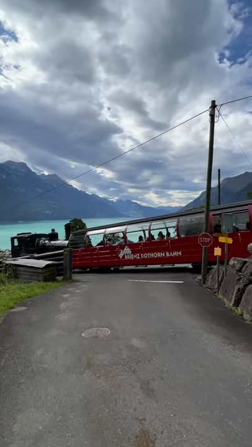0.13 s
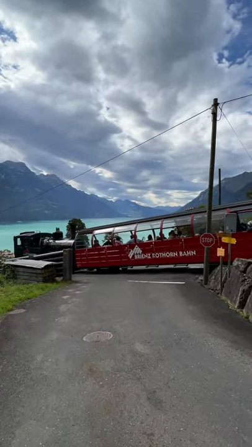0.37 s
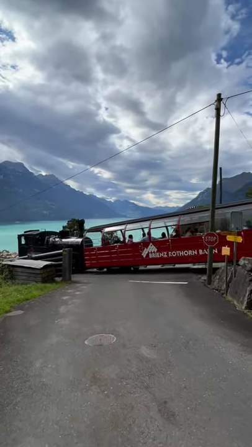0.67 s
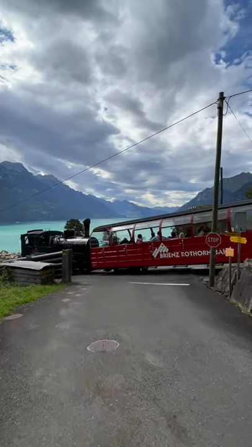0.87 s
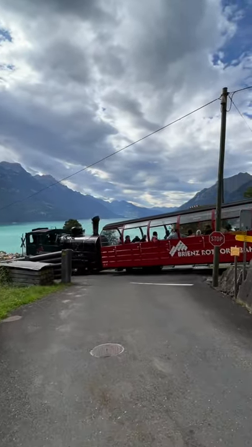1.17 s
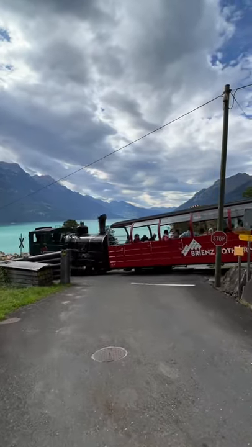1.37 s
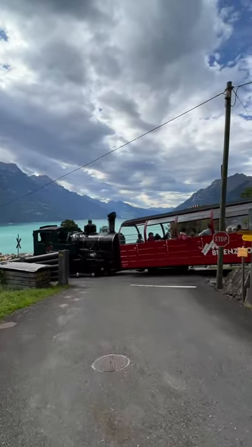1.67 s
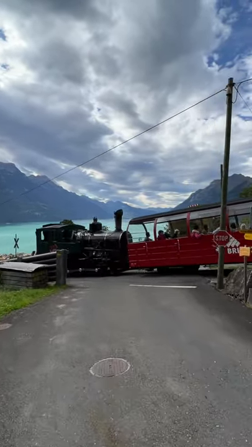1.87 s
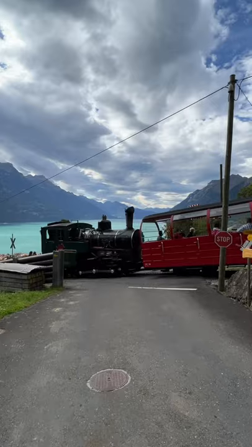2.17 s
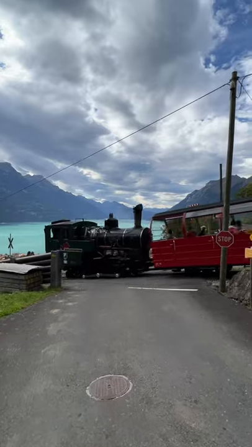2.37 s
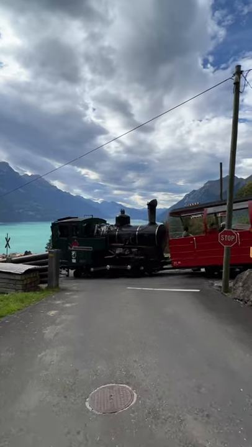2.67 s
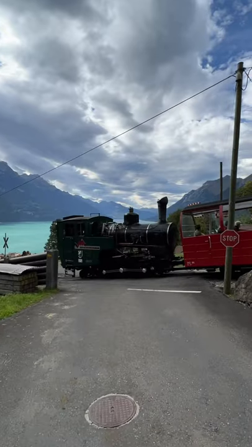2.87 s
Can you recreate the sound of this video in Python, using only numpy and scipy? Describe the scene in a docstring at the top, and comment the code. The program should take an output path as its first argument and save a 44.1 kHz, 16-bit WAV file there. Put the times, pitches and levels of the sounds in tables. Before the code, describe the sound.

Fast, regular steam train chuffing passes outdoors, with rumbling wheels and leaking steam.

```python
"""Small steam locomotive at a road crossing.

It pushes a coach across, some way ahead and left of a stereo microphone, over rumbling running gear.
The exhaust beats four times to each turn of the drive, unevenly: strong, weak, weak, fairly strong.
Each beat is a pop, a bark, a hiss, a thump and a short boom of the chimney.
The echo off the road lags more as the distance shrinks, so the bark sinks in colour."""
import sys
import numpy as np
from scipy import signal
from scipy.fft import rfft, irfft
from scipy.io import wavfile
from scipy.ndimage import uniform_filter1d, minimum_filter1d

SR = 44100
rng = np.random.default_rng(int(sys.argv[2]) if len(sys.argv) > 2 else 0)


def master(y):
    """Save y as 16-bit WAV."""
    cut = np.clip(np.atleast_2d(y).T, -1, 1)
    pcm = np.round(cut * 32767)  # scale
    wavfile.write(sys.argv[1], SR, pcm.astype(np.int16))


N = 132741
TIME = np.arange(N) / SR
HZ = np.fft.rfftfreq(N, 1 / SR)

# Exhaust beats. Each row: start in seconds, then relative bark, hiss, boom and thump levels in dB.
CHUFFS = [(0.019, -14, -19, -16, -9), (0.095, -22.5, -25, -23.4, -21), (0.168, -23, -27, -22, -18),
          (0.248, -18, -24, -16.5, -22), (0.325, -15.5, -20.5, -16.5, -17), (0.4, -19.5, -24, -23, -18),
          (0.47, -19.5, -26.5, -21, -20), (0.549, -16.5, -22, -18, -16), (0.627, -13.5, -19, -18.0, -17),
          (0.699, -21, -26, -44, -20), (0.771, -18.5, -27.5, -27, -17.5), (0.852, -15, -22, -18.5, -15),
          (0.928, -14.5, -19.5, -26.5, -27), (0.997, -23.5, -25, -27, -14.5),
          (1.071, -22.5, -25.5, -21.5, -25), (1.149, -13.5, -21.5, -16, -19.5),
          (1.225, -13.1, -19, -20, -16), (1.295, -20, -24.5, -29, -17.5), (1.367, -17, -25.5, -38, -27),
          (1.445, -13.5, -21, -28, -16.5), (1.521, -14.5, -18.5, -17, -15), (1.592, -18.5, -26, -32, -13.5),
          (1.663, -20.5, -27.5, -22, -19), (1.743, -13.5, -24.5, -20.5, -15.5),
          (1.815, -15.5, -19.5, -19, -17.5), (1.888, -19.5, -27, -30, -35), (1.959, -21.5, -27, -38, -17),
          (2.037, -15.5, -25.5, -27.5, -20.5), (2.112, -16, -22.5, -25, -17.5), (2.183, -21, -27, -23, -18),
          (2.256, -19, -28, -43, -15.5), (2.336, -16.5, -23, -26, -27), (2.412, -17.5, -19, -18.5, -15),
          (2.485, -19.5, -27, -38, -22), (2.556, -18.5, -27.5, -26, -24), (2.64, -15.5, -23, -26, -25),
          (2.719, -15.5, -18, -28.5, -13), (2.791, -18, -27.5, -33, -12.5), (2.866, -17.5, -27, -68, -25),
          (2.95, -14, -23, -59, -26)]
# The four beats of a turn. Each row: the bark's lead, rise and hold in seconds, its fade in dB per
# second, then boom, thump and pop accents in dB.
BEATS = [(.001, 0.0045, 0.014, 398, 6.5, 2.5, -4), (.001, 0.0088, 0.018, 362, 5.5, 4, -15),
         (.002, 0.0072, .016, 392, 3.5, 2, -17), (.002, .007, .014, 409, 5, 5.5, -10)]


def amp(db):
    """Decibels to gain."""
    return 10 ** (np.asarray(db) / 20)


def unit(x):
    """Scales to rms 1."""
    return x / np.sqrt(np.mean(x ** 2) + 1e-20)


def curve(points):
    """A table over frequency, joined on a log axis."""
    hz, value = np.transpose(points)
    return np.interp(np.log(HZ + 1), np.log(hz + 1), value)


def noise(spectrum):
    """Two unrelated noises of one colour. Each spectrum row: frequency in Hz, relative level in dB."""
    return unit(irfft(rfft(rng.standard_normal((2, N))) * amp(curve(spectrum)), N))


def flutter(rate_hz):
    """A smooth random wobble up to about this rate, rms 1."""
    return unit(irfft(rfft(rng.standard_normal(N)) / (1 + (HZ / rate_hz) ** 2), N))


def rumble():
    """The weight of the train on the track, and the low grinding of its wheels."""
    # Colours of track and wheels. Each row: frequency in Hz, relative level in dB.
    track_colour = [(8, -60), (20, -44), (29, -28), (40, -0.5), (60, 0.5), (80, -8), (105, -10),
                    (150, -7.5), (200, -11.5), (260, -15.5), (500, -56), (1500, -100)]
    grind_colour = [(100, -53), (165, -24), (200, 9), (245, -12.5), (305, 3.5), (370, -12), (600, -29),
                    (2000, -86)]
    # Swell of the grinding. Each row: time in seconds, level in dB.
    grind_level = [(0, -35), (.8, -39), (1.3, -28.5), (1.9, -31.5), (2.3, -33), (3, -34.5)]
    grind = amp(np.interp(TIME, *np.transpose(grind_level))) * noise(grind_colour)[0]
    return amp(-25.5) * noise(track_colour)[0] + grind


def running_gear():
    """An uneven wash of wheels, rods and leaking steam that draws nearer."""
    # Colour of the wash. Each row: frequency in Hz, relative level in dB.
    colour = [(100, -59), (200, -11), (300, 5), (400, 0), (700, 1), (1000, -8), (2500, -14.5), (4400, -20),
              (6000, -22.5), (10000, -26), (12200, -26), (15500, -31)]
    rise_db_per_s = 1.5
    return amp(-31) * unit(noise(colour) * amp(rise_db_per_s * TIME + 0.5 * flutter(rate_hz=4.2)))


def road_echo(x):
    """Adds the bounce off the road, duller and ever later as the train nears the microphone."""
    # Delay of the bounce. Each row: time in seconds, lag in milliseconds.
    lags = [(0, 1.49), (.9, 1.9), (1.8, 2.19), (2.4, 2.505), (3, 2.68)]
    cutoff_hz = 2450
    lag_s = np.interp(TIME, *np.transpose(lags)) / 1000
    dull = irfft(rfft(x) / (1 + (HZ / cutoff_hz) ** 2), N)
    return x + amp(-7.5) * np.array([np.interp(TIME - lag_s, TIME, channel) for channel in dull])


def microphone(x):
    """Places the train to the left: one signal reaches both ports, the other is scattered to the right."""
    # Likeness of the two ports. Each row: frequency in Hz, coherence from 0 to 1.
    likeness = [(150, 0.94), (260, 0.99), (350, 0.73), (600, 1), (800, 1), (1250, 0.18), (1750, 0.86),
                (2400, 0.34), (3500, 0.75), (6700, 1), (10000, 0.51), (12600, 1)]
    # Their balance. Each row: frequency in Hz, left minus right in dB.
    balance = [(170, -3), (290, -4), (380, -2), (540, 10), (680, 7.5), (830, 0.5), (1200, 14.5), (1750, 3),
               (2600, 2), (3500, 0), (4500, 3.5), (5500, 0)]
    # Their phase. Each row: frequency in Hz, lead of the left in radians.
    lead = [(170, 0.15), (260, 0.58), (430, 1.48), (750, 1.82), (950, 3.15), (1150, 5), (1750, 7.26),
            (2300, 7.7), (2900, 10.36), (4000, 11.26), (4600, 10.9), (4900, 8.9), (5200, 5.1), (5800, 5.1),
            (6700, 5.2), (8500, 5.7), (10000, 4.07), (11500, 4.43), (12600, 3.15)]
    shared, scattered = rfft(x)
    like, tilt = np.clip(curve(likeness), 0, 1), amp(curve(balance))
    right = (like * shared + np.sqrt(1 - like ** 2) * scattered) * np.exp(-1j * curve(lead))
    return irfft(np.array([tilt * shared, right]) * np.sqrt(2 / (1 + tilt ** 2)), N)


def chimney_boom():
    """Each beat shoves the air with a thump and rings the chimney's lowest resonance."""
    boom_hz, boom_rise_s, boom_t60_s = 144.4, 0.0021, 0.2
    thump_hz, thump_rise_s, thump_lead_s = 52, 0.012, 0.0033
    out = np.zeros(N)
    for k, (start, _, _, boom_db, thump_db) in enumerate(CHUFFS):
        boom_accent, thump_accent = BEATS[k % len(BEATS)][4:6]
        part = out[round((start - thump_lead_s) * SR):][:SR // 3]
        age = TIME[:len(part)]
        t = np.maximum(age - thump_lead_s, 0)
        boom = np.minimum(t / boom_rise_s, 1) * amp(boom_db + boom_accent - 60 * t / boom_t60_s)
        swell = age / thump_rise_s
        thump = amp(thump_db + thump_accent) * (swell * np.exp(1 - swell)) ** 3
        part += thump * np.sin(2 * np.pi * thump_hz * age) - boom * np.sin(2 * np.pi * boom_hz * t)
    return signal.sosfilt(signal.butter(2, 30, "high", fs=SR, output="sos"), out)


def pop_at(seconds):
    """Pitch and level of the pop at a moment."""
    # The pop as the valve opens. Each row: time in seconds, pitch in Hz, relative level in dB.
    course = [(0, 635, -0.5), (.33, 628, 4), (.63, 636, 1.5), (0.931, 569, 1), (1.52, 579, -2.5),
              (1.82, 547, -9.5), (2.11, 510, -1.5), (2.42, 403, -4), (2.72, 333, -5.5), (3, 280, -15)]
    times, hz, db = np.transpose(course)
    return np.interp(seconds, times, hz), np.interp(seconds, times, db)


def pops():
    """The first slug of steam in each beat gives a short pitched pop of a few cycles."""
    # The pop's partials. Each row: multiple of its pitch, relative level in dB.
    modes = [(.8, -21), (0.999, -4), (1.24, -7.5)]
    lead_s, rise_s, pitch_drift = 0.0011, 0.0029, 0.062
    out = np.zeros(N)
    for k, (start, *_) in enumerate(CHUFFS):
        detune, glide = rng.standard_normal(2)
        part = out[round((start - lead_s) * SR):][:SR // 20]
        swell = TIME[:len(part)] / rise_s
        pitch_hz, pop_db = pop_at(start)
        hz = pitch_hz * (1 + pitch_drift * (.5 * detune + glide * np.tanh(swell - 1)))
        cycles = np.cumsum(hz) / SR
        ring = sum(amp(db) * np.sin(2 * np.pi * ratio * cycles) for ratio, db in modes)
        part += amp(BEATS[k % len(BEATS)][6] + pop_db) * swell * np.exp(1 - swell) * ring
    return out


def puffs(level_column, shapes):
    """Steam flow: the valve eases open, holds, the cylinder empties; the surroundings add a faint tail."""
    tail_db, tail_db_per_s = -25, 70
    power = np.zeros(N)
    for k, chuff in enumerate(CHUFFS):
        lead, rise, hold, fade_db_per_s = shapes[k % len(shapes)][:4]
        first = max(round(chuff[0] * SR) - SR // 40, 0)
        t = TIME[first:first + SR // 2] - chuff[0] + lead
        opening = .5 + .5 * np.tanh(2 * (t / rise - .5))
        late = np.maximum(t - hold, 0)
        decay = amp(-fade_db_per_s * late) ** 2 + amp(tail_db - tail_db_per_s * late) ** 2
        power[first:first + len(t)] += (amp(chuff[level_column]) * opening) ** 2 * decay
    return np.sqrt(power)


def hoot(x, pitch_ratio=1.034, width_hz=100):
    """A resonance just above the pop's pitch sinks with it and makes the bark hollow."""
    carrier = np.exp(2j * np.pi * np.cumsum(pitch_ratio * pop_at(TIME)[0]) / SR)
    pole = np.exp(-np.pi * width_hz / SR)
    ring = 2 * (carrier * signal.lfilter([1 - pole], [1, -pole], x / carrier)).real
    return x + amp(-7.5) * ring


def swirl(x, depth_db=2.5, patch_hz=240, patch_s=.035):
    """Turbulence gives each puff its own patches of colour."""
    hz, t, spectra = signal.stft(x, SR, nperseg=512, noverlap=384)
    patches = rng.standard_normal(spectra.shape[1:])
    for axis, steps in enumerate((patch_hz / hz[1], patch_s / t[1])):
        patches = uniform_filter1d(patches, max(round(steps), 1), axis)
    gain = amp(depth_db * unit(patches) * np.minimum(hz / 1000, 1)[:, None])
    return signal.istft(spectra * unit(gain), SR, nperseg=512, noverlap=384)[1][:, :N]


def chimney_rings(x):
    """The chimney's upper resonances ring along with the jet."""
    # Steady resonances. Each row: frequency in Hz, width in Hz, level against the jet in dB.
    rings = [(1260, 110, -7), (2600, 170, -4), (3430, 190, -6), (4450, 220, -6)]
    gain = 1 + sum(amp(db) / (1 + 2j * (HZ - hz) / width) for hz, width, db in rings)
    return irfft(rfft(x) * gain, N)


def exhaust():
    """The sputtering jet from the chimney: a pop, a hollow bark and a hiss."""
    # The bark as the chimney shapes it. Each row: frequency in Hz, relative dB far off, then nearer.
    bark_colour = [(60, -18, -52), (208, 4, 5), (242, -17, -7.5), (296, -0.5, 5.5), (364, -13, -17.5),
                   (396, -2, -0.5), (540, 0.5, -4), (660, -1, -1), (762, 4, -2.5), (845, -4, -6),
                   (1100, -3.5, -5.5), (1690, -8, -12), (2600, -21, -17.5), (5010, -60, -31),
                   (12030, -90, -90)]
    # The jet's hiss. Each row: frequency in Hz, relative level in dB.
    hiss_colour = [(500, -5), (1400, -5), (2000, -0.5), (2700, -2.5), (3300, -4.5), (4400, -5.5),
                   (5200, -10), (6300, -9.5), (8000, -14), (10000, -15), (12200, -17), (15500, -20)]
    # Hiss leaks out just ahead of each beat. Each row: lead, rise, hold in seconds, fade in dB per second.
    leaks = [(0.0034, 0.0071, .014, 455), (0.0026, .011, .018, 562), (.003, .008, 0.016, 504),
             (.003, 0.0097, 0.017, 622)]
    far, near = (noise(np.array(bark_colour)[:, [0, column]]) for column in (1, 2))
    approach = TIME / TIME[-1]
    rush = np.sqrt(1 - approach) * far + np.sqrt(approach) * near
    bark = hoot(amp(-2) * rush * puffs(1, BEATS))
    hiss = amp(0.86) * noise(hiss_colour) * puffs(2, leaks)
    sputter = unit(amp(-1.25 * flutter(rate_hz=364)))
    jet = chimney_rings(swirl(bark + hiss * sputter))
    return road_echo(jet + [pops(), np.zeros(N)])  # pops go in the signal both ports share


def scene():
    """Exhaust and running gear to the left, with the bass in the middle."""
    return microphone(exhaust() + running_gear()) + chimney_boom() + rumble()


def record(dry):
    """The highest peaks are gently held down; then the recorder's cut-off ends the top treble."""
    ceiling, edge_hz = .95, 15850
    allowed = np.minimum(ceiling / (abs(dry).max(0) + 1e-9), 1)
    gain = uniform_filter1d(minimum_filter1d(allowed, size=180), size=180)
    lowpass = signal.firwin(511, edge_hz, window=("kaiser", 9), fs=SR)
    return signal.oaconvolve(dry * gain, lowpass[None], "same")


dry = scene()
out = record(dry)
master(out)
```